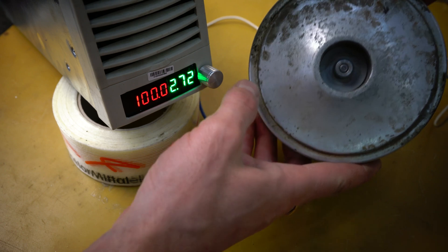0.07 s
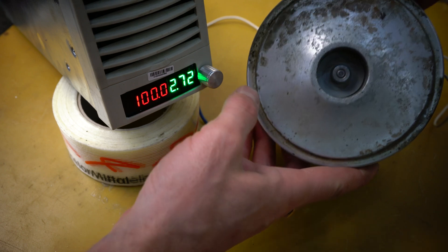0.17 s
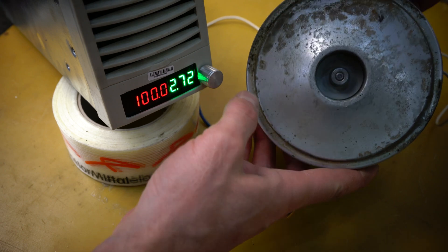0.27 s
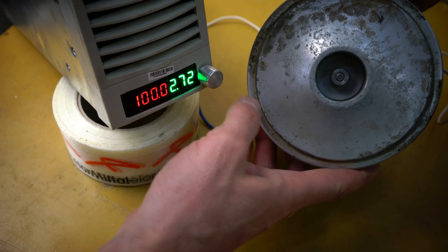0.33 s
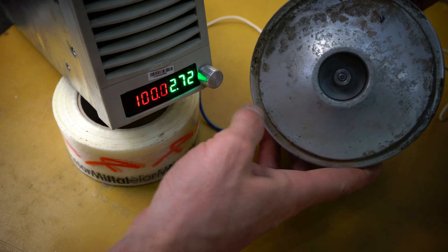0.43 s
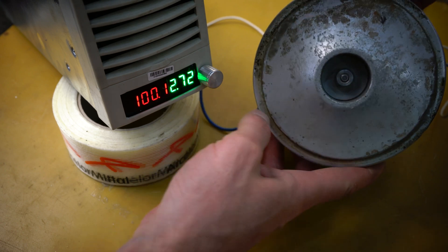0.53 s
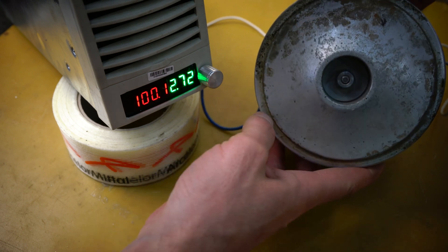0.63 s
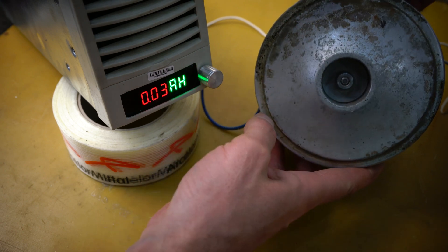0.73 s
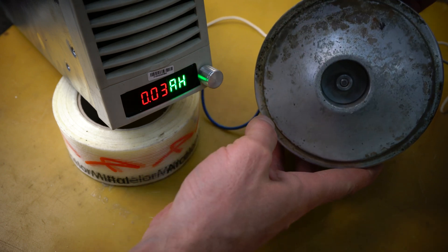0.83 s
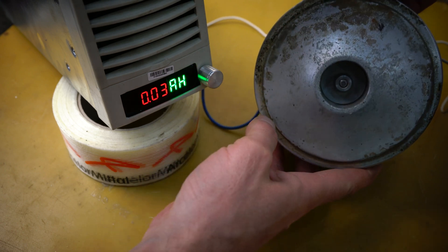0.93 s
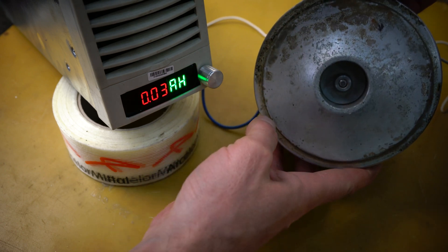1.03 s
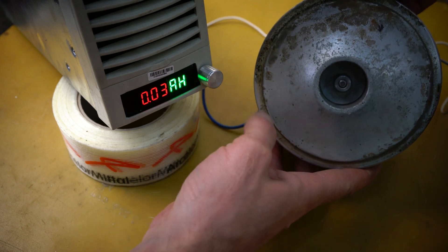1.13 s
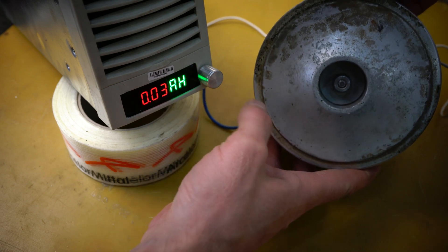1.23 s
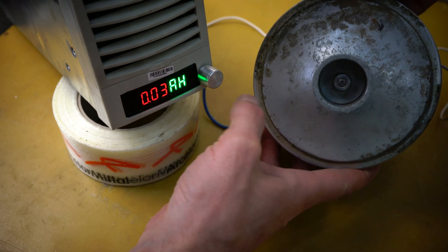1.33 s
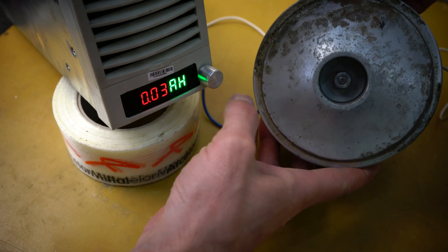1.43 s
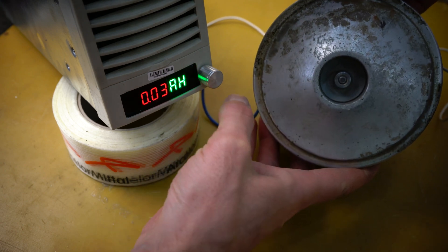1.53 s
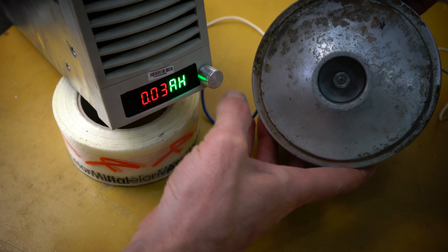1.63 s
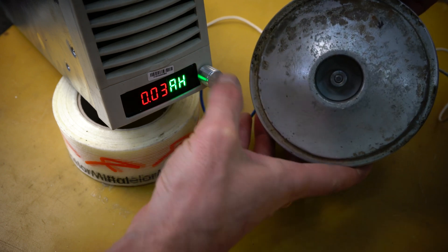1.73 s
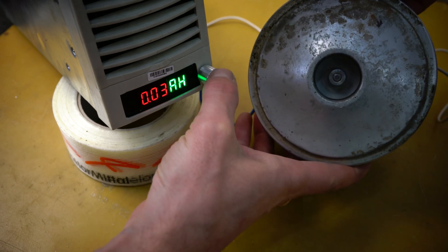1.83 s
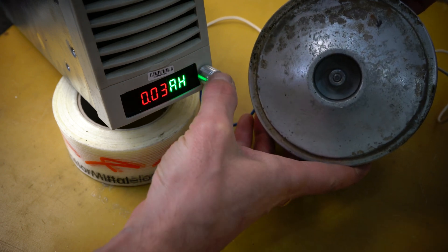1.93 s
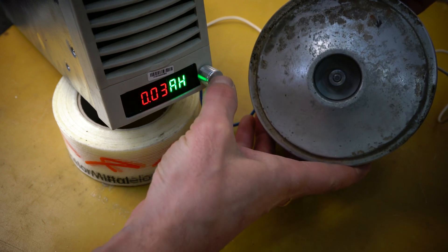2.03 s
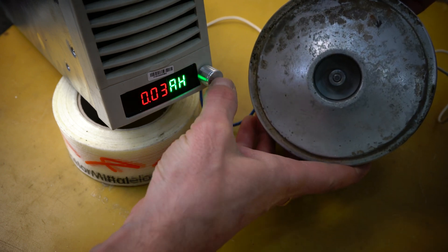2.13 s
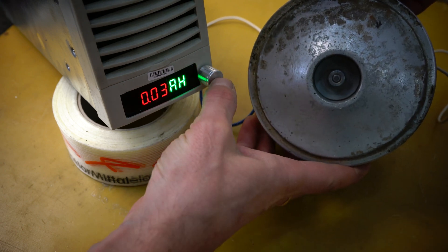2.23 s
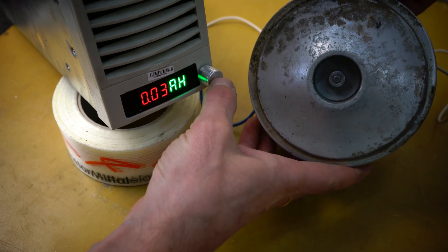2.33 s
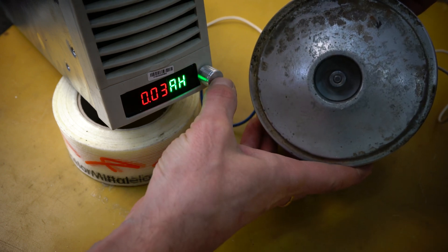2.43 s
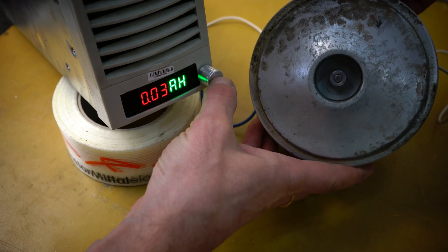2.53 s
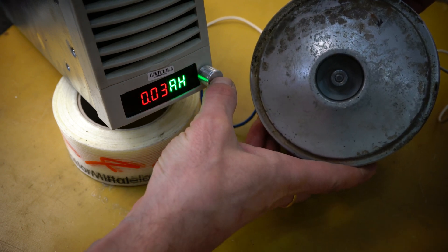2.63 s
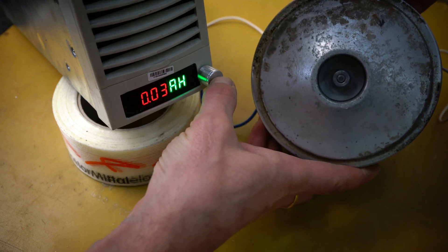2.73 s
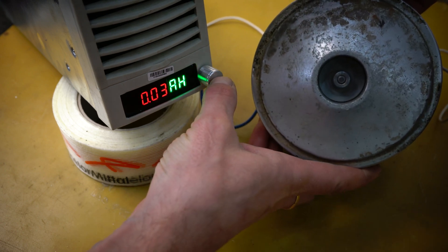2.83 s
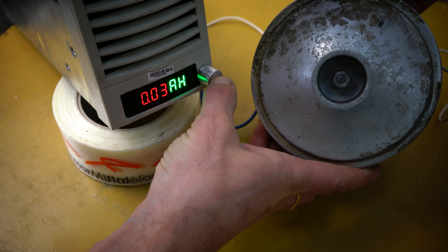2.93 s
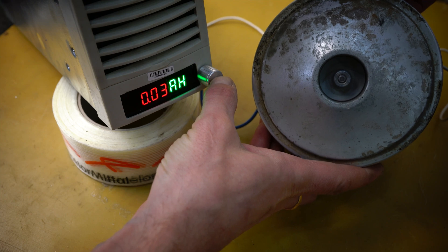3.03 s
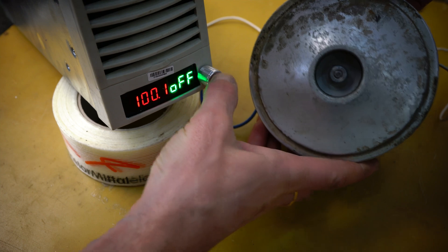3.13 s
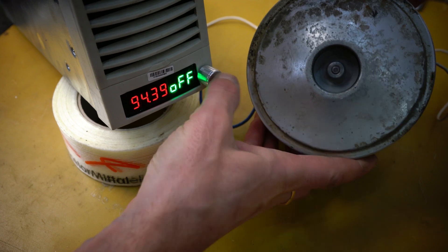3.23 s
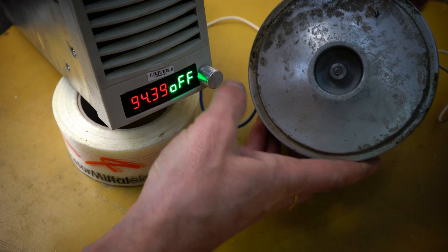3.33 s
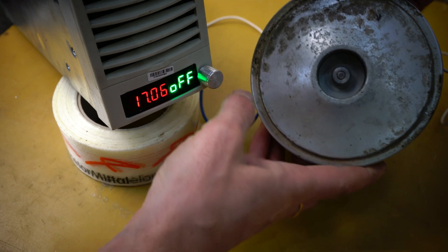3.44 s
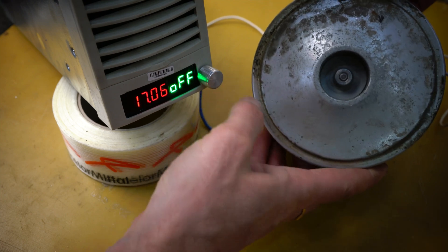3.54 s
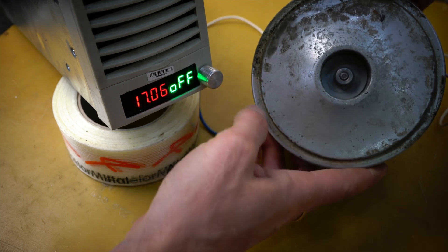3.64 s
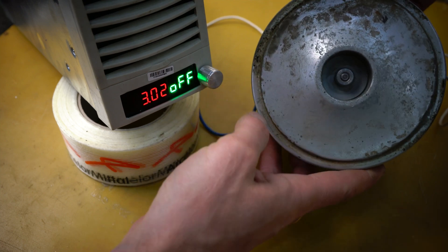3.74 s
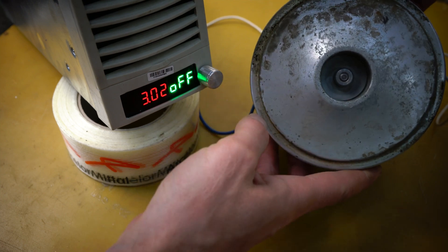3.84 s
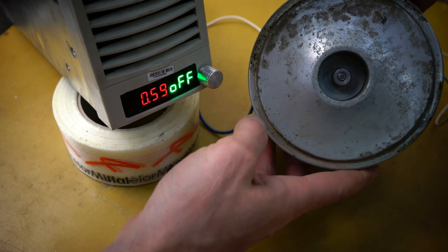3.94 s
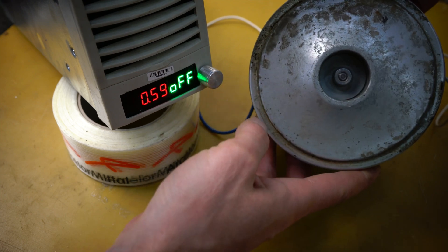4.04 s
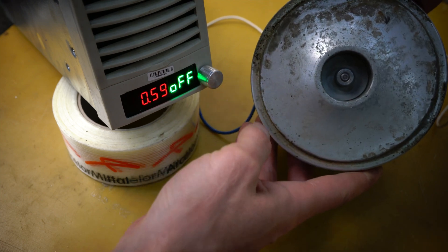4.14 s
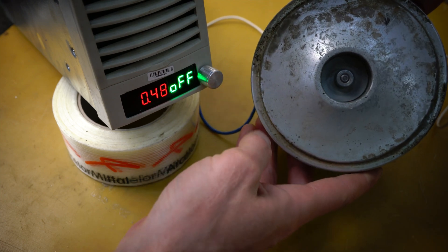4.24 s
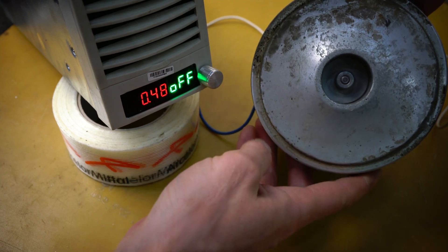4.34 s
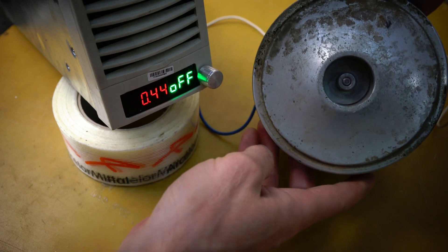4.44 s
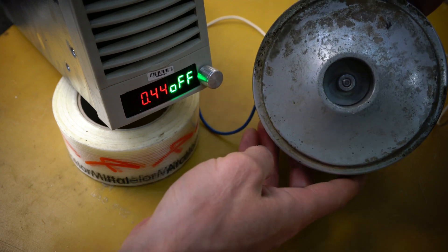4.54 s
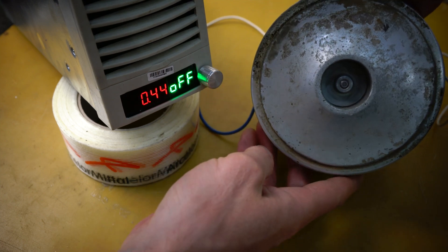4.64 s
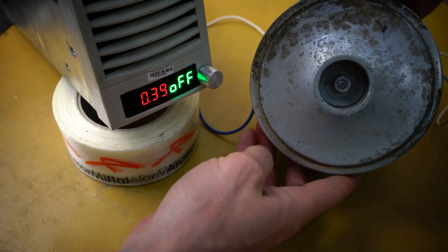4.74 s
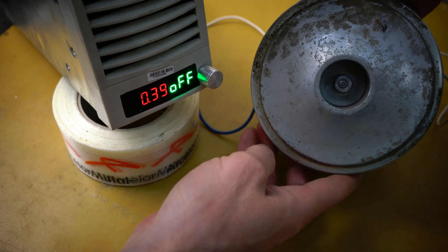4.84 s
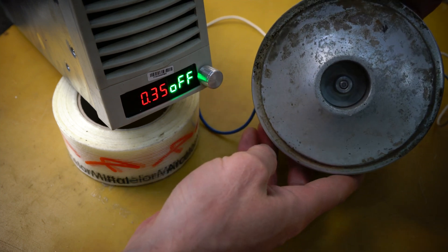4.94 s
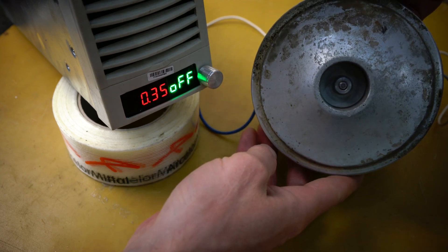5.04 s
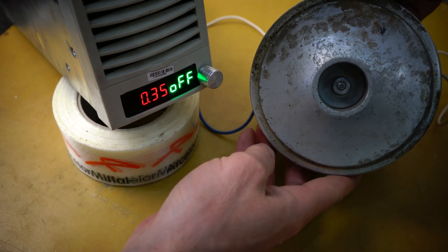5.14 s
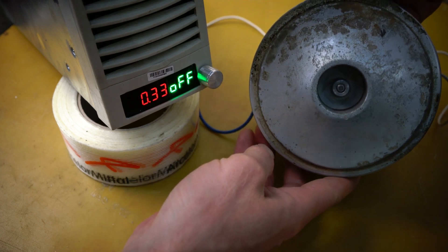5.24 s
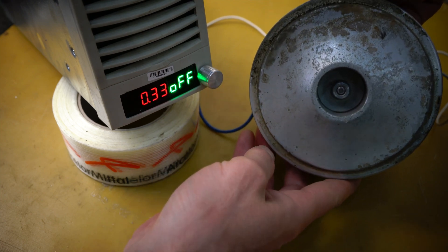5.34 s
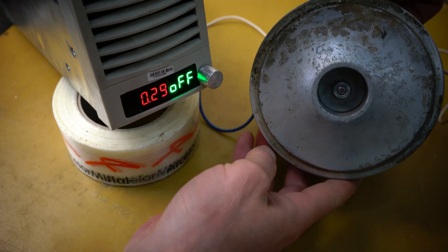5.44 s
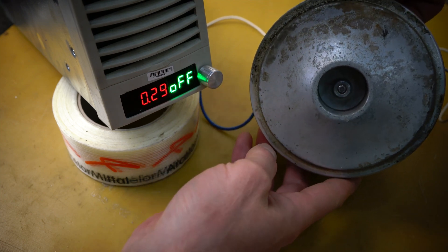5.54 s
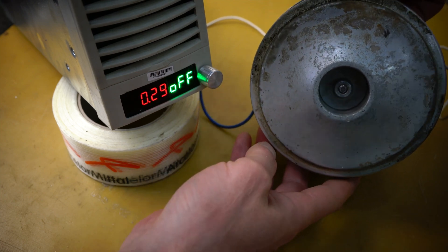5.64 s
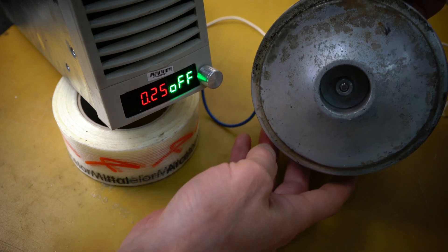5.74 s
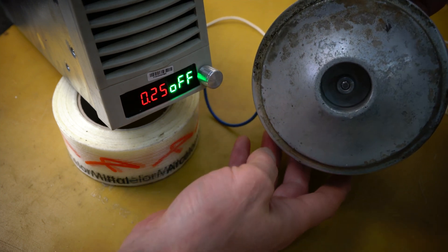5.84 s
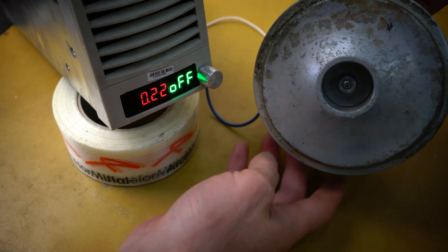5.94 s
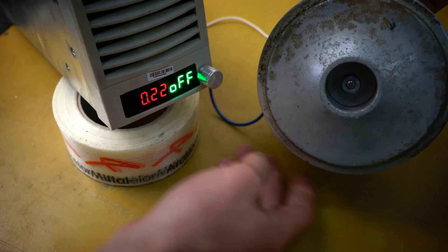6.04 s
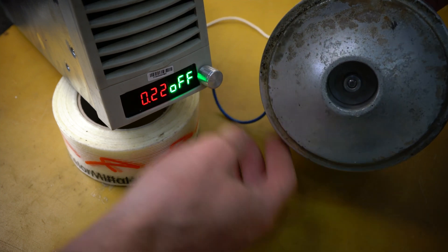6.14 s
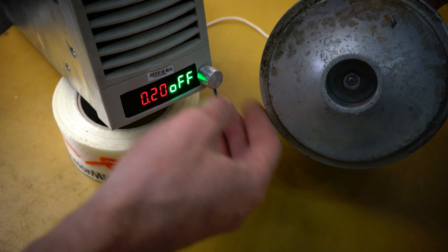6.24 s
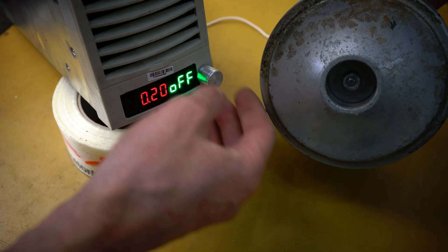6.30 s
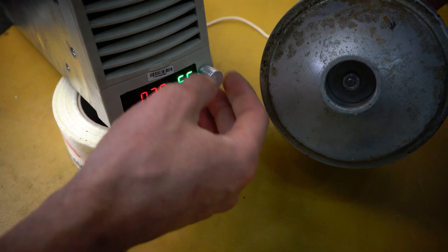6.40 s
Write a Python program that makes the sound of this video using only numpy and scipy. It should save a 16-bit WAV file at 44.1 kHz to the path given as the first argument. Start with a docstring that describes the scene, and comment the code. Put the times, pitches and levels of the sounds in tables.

```python
"""At a workbench, a bare vacuum cleaner motor in the hand runs at a steady speed from a bench power supply.
Its nine-bladed impeller whines over rushing air (coloured noise); brushes hiss on a 22-bar commutator.
When the power is cut, friction and drag coast the motor down and its tones sink with the shaft.
The loose rotor knocks once a turn and rings the steel housing, made as pulses through resonances."""
import sys
import numpy as np
from scipy import signal
from scipy.fft import rfft, irfft, next_fast_len
from scipy.io import wavfile
from scipy.ndimage import uniform_filter1d, map_coordinates

SR = 44100
rng = np.random.default_rng(int(sys.argv[2]) if len(sys.argv) > 2 else 0)


def unload_audio(sound):
    """Save the sound as a 16-bit wav file, at the path given as the first command line argument."""
    columns = np.transpose(np.atleast_2d(sound))
    # keep every value between -1 and 1, then stretch to whole-number steps
    steps = np.round(np.clip(columns, -1, 1) * 32767)
    wavfile.write(sys.argv[1], SR, steps.astype(np.int16))


N = 285327
FULL_SPEED = 278.1   # shaft speed under power, turns per s
CUTOFF_HZ = 15650    # top of the recorded sound

# the two tones as the hand tilts the motor, before later gains: t/s, blade tone level/dB, bar tone level/dB
TILT_TONES = [(0.0, -31.5, -46), (0.12, -27.5, -37), (0.4, -28, -35), (0.5, -31.5, -45), (0.74, -26, -32),
              (1.7, -27.5, -36), (2.5, -26.5, -28.5), (3.1, -26.5, -32)]


def from_db(db):
    """Decibels to gain."""
    return 10 ** (np.asarray(db) / 20)


def rms_one(x):
    """Scale to an average strength (rms) of 1."""
    return x / np.sqrt(np.mean(np.abs(x) ** 2) + 1e-20)


def evened(x, size=5000):
    """Hold the short-term rms at 1, over a window of size samples."""
    return x / np.sqrt(uniform_filter1d(x * x, size) + 1e-20)


def in_time(rows):
    """Read each column of a curve table at every sample."""
    s, *columns = np.transpose(rows)
    return [np.interp(np.arange(N) / SR, s, c) for c in columns]


def drift(rate):
    """Slow random wandering of rms 1 that changes about rate times a second."""
    step = 40   # samples between computed points
    r = np.exp(-2 * step * np.pi * rate / SR)
    grain = rng.standard_normal(N // step + 2002)
    slow = signal.lfilter([1], [1, -2 * r, r * r], grain)[2000:]   # drop the filter's start-up
    return np.interp(np.arange(N) / step, np.arange(len(slow)), rms_one(slow))


def noise(spectrum):
    """Steady noise of rms 1, coloured by a table of frequencies and levels."""
    hz, db = np.transpose(spectrum)
    size = next_fast_len(N)
    bins = np.maximum(np.arange(size // 2 + 1) * SR / size, 1)
    gain = from_db(np.interp(np.log(bins), np.log(hz), db))
    white = rng.standard_normal(size)
    return rms_one(irfft(rfft(white) * gain, size)[:N])


def resonate(x, modes):
    """Resonances side by side, each of opposite sign to the one before."""
    out = np.zeros(N)
    for k, (hz, width, db) in enumerate(modes):
        r = np.exp(-np.pi * width / SR)
        poles = [1, -2 * r * np.cos(2 * np.pi * hz / SR), r * r]
        ringing = (1 - r * r) / 2 * signal.lfilter([1, 0, -1], poles, x)
        out += (-1) ** k * from_db(db) * ringing
    return out


def radiate(x, modes):
    """Resonances of one sign, with notches between them: a gliding tone comes and goes."""
    return sum(resonate(x, [mode]) for mode in modes)


def tone(turns, multiple, flutter_db, wobble):
    """A tone locked to a count of turns, fluttering in level and in phase (wobble in radians)."""
    flutter = from_db(flutter_db * drift(17.0))
    phase = 2 * np.pi * multiple * turns + wobble * drift(18)
    return np.sqrt(2) * flutter * np.sin(phase)


def shaft():
    """Speed of the rotor in turns per s: steady under power, then braked by friction and drag."""
    cut_s, drive_fade_s = 3.179, .116   # when the supply is cut, and how long its drive takes to die
    # turns per s lost each second: brush friction, grease (times speed), air (times speed squared)
    friction, grease_drag, air_drag = 27.99, .0885, .001546
    step_s = .001
    times = np.arange(0, N / SR + step_s, step_s)
    speeds = [FULL_SPEED]
    for t in times[:-1]:
        v = speeds[-1]
        released = min(max((t - cut_s) / drive_fade_s, 0), 1)
        braking = friction + grease_drag * v + air_drag * v * v
        speeds.append(v - step_s * released * braking)
    return np.interp(np.arange(N) / SR, times, speeds)


def level(speed, powered_db, loose_db, loose_within, fall_db, knee):
    """A sound gains loose_db as the undriven rotor sheds its first loose_within turns per s,
    and loses fall_db for each halving of speed below the knee (turns per s)."""
    loose = np.clip((FULL_SPEED - speed) / loose_within, 0, 1)
    halvings = np.maximum(np.log2(knee / speed), 0)
    return powered_db + loose_db * loose - fall_db * halvings


def short_changes():
    """For a moment the air, knock or hiss grows louder or softer, holds, then returns; in dB of change."""
    # short level changes: start t/s, length t/s, air level/dB, rotor knock level/dB, brush hiss level/dB
    changes = [(0.088, 0.24, 2.5, 2.5, 2), (1.62, .07, -1, 2, 2), (2.595, 0.068, 4, 2.5, 2.5),
               (2.868, 0.051, 3.5, 2, 2.5), (3.497, 0.047, 0.5, 6, -0.5), (3.67, 0.076, 1.5, 1.5, 1),
               (3.754, 0.095, -4.5, 7, -1), (4.05, .24, 0.5, 2.8, 1)]
    edge_s = .025   # time to change and to return
    t = np.arange(N) / SR
    extra = np.zeros((3, N))
    for start, length, *db in changes:
        inside_s = np.minimum(t - start, start + length - t)
        extra += np.outer(db, np.clip(.5 + inside_s / edge_s, 0, 1))
    return extra


def strengths(speed):
    """Control levels in dB of air, rotor knock and brush hiss: speed, short changes and a shared waver."""
    air_db = level(speed, powered_db=-36.5, loose_db=5.5, loose_within=25, fall_db=12.5, knee=183)
    knock_db = level(speed, powered_db=-25.5, loose_db=4.4, loose_within=91, fall_db=5.6, knee=175)
    hiss_db = level(speed, powered_db=-23.0, loose_db=3.0, loose_within=9, fall_db=6.0, knee=202)
    # late in the coast (below 67 turns per s) the brushes fall quiet faster: 4.5 dB more per halving
    hiss_db = hiss_db - 4.5 * np.maximum(np.log2(67 / speed), 0)
    waver_db = 0.4 * drift(7.1)
    return np.array([air_db, knock_db, hiss_db]) + short_changes() + waver_db


def workshop():
    """The background of the workshop: steady coloured noise."""
    # colour of the room noise: f/Hz, relative level/dB per Hz
    room_colour = [(25, -34), (55, -17), (120, -5.5), (250, -2.5), (360, -4), (425, 14.5), (540, -15),
                   (700, -13), (1500, 3.5), (8000, -18)]
    return from_db(-50.0) * noise(room_colour)


def squeaks(wobble):
    """Now and then a brush sticks and slips at a pitch of its own, whatever the shaft speed."""
    # brush squeaks that hold their pitch: start t/s, end t/s, f/Hz, level/dB
    squeak_list = [(.3, 1.6, 15020, -39), (1.7, 3.2, 12905, -43), (3.68, 3.85, 9300, -33),
                   (3.68, 3.85, 9030, -33)]
    t = np.arange(N) / SR
    out = np.zeros(N)
    for start, end, hz, db in squeak_list:
        held = np.clip(np.minimum(t - start, end - t) / .015, 0, 1)   # 15 ms fades
        out += held * from_db(db) * tone(t, hz, flutter_db=6.0, wobble=wobble)
    return out


def bearing(turns, speed):
    """A bearing's shaft-locked tone, faint under power, swells briefly just after the drive lets go."""
    db = level(speed, powered_db=-42.5, loose_db=13.5, loose_within=14, fall_db=45, knee=240)
    return from_db(db) * tone(turns, 4.033, flutter_db=3.0, wobble=0.98)


def chatter(turns, speed):
    """Roughness of the commutator, read off at shaft speed: bands of hiss that sink as the rotor slows."""
    # bands that follow the shaft: f/multiples of shaft speed, width/the same multiples, relative level/dB
    chatter_bands = [(41.3, 7, -2), (67.3, 3, -1), (75.7, 6, -6.5), (88.5, 2.5, -4), (118, 26, -1.5)]
    out = np.zeros(N)
    for multiple, width, db in chatter_bands:
        grain = rng.standard_normal((2, N // 10))
        a, b = (map_coordinates(g, [turns * width], order=3, mode="wrap") for g in grain)
        angle = 2 * np.pi * multiple * turns
        band = a * np.cos(angle) + b * np.sin(angle)
        # fade out bands too high for the sample rate
        audible = np.clip((SR / 2 - multiple * speed) / (SR / 2 - CUTOFF_HZ), 0, 1)
        out += from_db(db) * audible ** 2 * band
    return out


def commutator(turns, speed, hiss_db, bar_db, loose_db, fall_db, brush_cut_hz):
    """The bar tones and the chatter swell each time they glide through a resonance of the frame."""
    # tones of the passing bars: f/multiples of the bar rate, relative level/dB, phase wobble/radians
    bar_partials = [(1, 2, 0.17), (2, -0.8, 0.6), (3, -1, 1.7), (4, -3.5, 2.2)]
    # resonances of the brush frame: f/Hz, width/Hz, relative level/dB
    frame = [(2240, 70, -4), (2720, 70, -4), (3250, 100, -2), (3703, 100, -0.5), (4016, 96, -1.5),
             (4700, 350, -5), (5570, 240, -2), (6025, 390, 0.5), (6980, 280, 1), (7700, 290, 1),
             (9000, 490, -4.5), (11060, 830, -3), (14000, 430, -1), (15050, 730, 0)]
    bars = np.zeros(N)
    for k, db, wobble in bar_partials:
        multiple = k * 22   # 22 bars pass in one turn
        # the width of a brush smooths away the highest tones
        smoothed = 1 / (1 + (multiple * speed / brush_cut_hz) ** 6)
        bars += smoothed * from_db(db) * tone(turns, multiple, flutter_db=2.2, wobble=wobble)
    tilt_db = in_time(TILT_TONES)[1]
    bars_db = tilt_db + level(speed, bar_db, loose_db, loose_within=6.6, fall_db=fall_db, knee=300)
    rough = from_db(hiss_db - 5.5) * chatter(turns, speed)
    return radiate(from_db(bars_db) * bars, frame) + resonate(rough, frame)


def sizzle(turns, speed, db, flicker_db, fade_db, squeal_fade_db):
    """Near full speed the brushes ring and squeal in their holders; fades are in dB per turn per s lost."""
    # resonances of the brushes in their holders: f/Hz, width/Hz, relative level/dB
    brush_modes = [(8320, 500, -11), (9410, 240, -6), (10400, 460, -3.5), (10900, 520, -0.5),
                   (11450, 1050, -5), (15020, 130, -14)]
    # thin whistles: f/multiples of shaft speed, level/dB relative to the ringing at full speed
    whistles = [(39.45, -12.5), (39, -10), (40.4, -15)]
    ringing = rms_one(resonate(rng.standard_normal(N), brush_modes))
    slowed = FULL_SPEED - speed
    for multiple, squeal_db in whistles:
        whistle = tone(turns, multiple, flutter_db=3.2, wobble=2.1)
        ringing += from_db(squeal_db - squeal_fade_db * slowed) * whistle
    # the first 8 turns per s lost leave the overall level alone
    overall_db = db - fade_db * np.maximum(slowed - 8, 0) + flicker_db * drift(34)
    return from_db(overall_db) * ringing


def brushes(turns, speed, hiss_db, throb):
    """Carbon sliding on copper, pressed a little harder once a turn; its colour shifts with speed."""
    # hiss on a fast rotor: f/Hz, relative level/dB per Hz
    fast_colour = [(500, -29), (1900, 1.5), (2500, 3), (3300, 5.5), (3900, -3.5), (4350, -1.5),
                   (4800, -1.5), (5200, 0), (5800, 1), (6600, -1.5), (7600, 1.5), (8600, 2), (11500, -6),
                   (15600, 0)]
    # hiss on a slow rotor: f/Hz, relative level/dB per Hz
    slow_colour = [(700, -29.5), (1900, 6), (2600, -1.5), (3900, -8), (4400, -1.5), (4850, 2), (5150, -3.5),
                   (5800, 4.5), (7400, 3.5), (8400, -1), (10700, -2.5), (11700, -3), (13400, 2), (15300, 2)]
    pressure = 1 + throb * np.cos(2 * np.pi * turns)
    fast = np.clip((speed - 130) / 110, 0, 1)
    sliding = np.sqrt(fast) * from_db(3.5) * noise(fast_colour)
    sliding += np.sqrt(1 - fast) * from_db(3.0) * noise(slow_colour)
    return from_db(hiss_db) * pressure * sliding


def rotor_knock(turns, speed, uneven_db, rub_db, wander, loose):
    """The rotor hits one spot of its bearing once a turn and grazes others that come and go; the housing rings."""
    # resonances of the steel housing: f/Hz, width/Hz, relative level/dB
    housing = [(432, 19, -20.5), (631, 34, -15.5), (834, 16, -12), (946, 16.3, -5.5), (1125, 51, 0),
               (1203, 51, -1), (1307, 51, -3.5), (1417, 34.7, 3), (1553, 45, -3.5), (1687, 53, -9),
               (1984, 50, -6.5), (2267, 66, -12), (2714, 24, -16.5), (2920, 59, -15), (3388, 30, -12),
               (3884, 70, -13.5), (4840, 55, -13)]
    # a slow rotor is no longer flung to one side, so its contacts spread round the turn
    spread = wander + loose * np.clip((170 - speed) / 110, 0, 1)
    angles = (np.arange(8) + rng.uniform(-.35, .35, 8)) / 8   # contact spots, in turns
    hits = np.zeros(N)
    for k, angle in enumerate(angles):
        at = np.flatnonzero(np.diff(np.floor(turns + angle)))
        strength = np.ones(N) if k == 0 else spread * drift(5.8)
        uneven = from_db(uneven_db * rng.standard_normal(N // 100)[:len(at)])
        hits[at] += strength[at] * uneven
    # keep the power of the hits alike at any speed and spread
    force = hits / np.sqrt((1 + (len(angles) - 1) * spread ** 2) * speed / SR)
    # the balls roll slightly out of step with the shaft: their lines lie a little above its multiples
    slip = np.exp(2j * np.pi * .033 * turns)
    force = np.real(signal.hilbert(force, next_fast_len(N))[:N] * slip)
    rubbing = from_db(rub_db) * rng.standard_normal(N)
    ringing = resonate(force + rubbing, housing)
    # so small a shell radiates little bass
    return evened(signal.sosfilt(signal.butter(2, 330, "high", fs=SR, output="sos"), ringing))


def impeller(turns, speed, air_db, whine_db, fall_db):
    """Turbulent air, and the tone of the passing blades, which swells as it glides through cover resonances."""
    # colour of the rushing air: f/Hz, relative level/dB per Hz
    air_colour = [(25, -66), (60, -43), (110, -25.5), (200, -14.5), (310, -8.5), (440, -3.5), (560, -2),
                  (800, 3.5), (1500, 4.5), (2350, -2), (3350, -0.5), (3900, -7), (7000, -10), (16000, -29)]
    # resonances of the impeller cover: f/Hz, width/Hz, relative level/dB
    cover = [(2508.3, 52, 2.14), (2200, 43, 6), (2060, 49, 8), (1460, 200, -15)]
    blades = tone(turns, 9, flutter_db=1.5, wobble=0.083)   # nine blades pass in one turn
    tilt_db = in_time(TILT_TONES)[0]
    blades_db = tilt_db + whine_db - fall_db * np.log2(FULL_SPEED / speed)
    whine = radiate(from_db(blades_db) * blades, cover)
    air = from_db(air_db + 9.0 + 0.21 * drift(17)) * noise(air_colour)
    return whine + air


def scene():
    """The motor close to the microphone over the workshop noise, the same in both channels."""
    speed = shaft()
    turns = np.cumsum(speed) / SR
    air_db, knock_db, hiss_db = strengths(speed)
    # under power the rotor chatters; coasting, it knocks with less rubbing noise
    driven = np.clip((speed - 230) / 40, 0, 1)
    knock = rotor_knock(turns, speed, uneven_db=2.0, rub_db=-10 + 6 * driven, wander=.22, loose=.9)
    sound = workshop() + squeaks(wobble=1.3) + bearing(turns, speed)
    sound += commutator(turns, speed, hiss_db, bar_db=0.0, loose_db=4.0, fall_db=3.2, brush_cut_hz=7200)
    sound += sizzle(turns, speed, db=-19.5, flicker_db=1.3, fade_db=.28, squeal_fade_db=1.8)
    sound += brushes(turns, speed, hiss_db, throb=0.078)
    sound += from_db(knock_db) * knock
    sound += impeller(turns, speed, air_db, whine_db=1.0, fall_db=5.5)
    return np.array([sound, sound])


def record(dry):
    """The microphone drops the deepest bass; the top is cut steeply."""
    thin = signal.sosfilt(signal.butter(2, 48, "high", fs=SR, output="sos"), dry)
    return signal.sosfilt(signal.ellip(12, .1, 90, CUTOFF_HZ, fs=SR, output="sos"), thin)


dry = scene()
out = record(dry)
unload_audio(out)
```